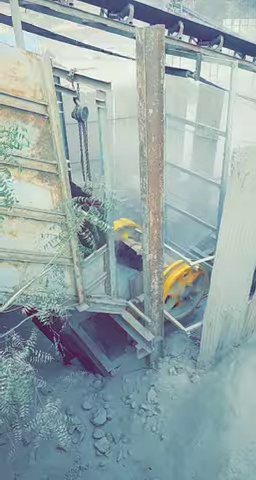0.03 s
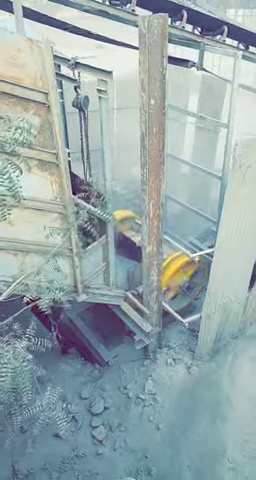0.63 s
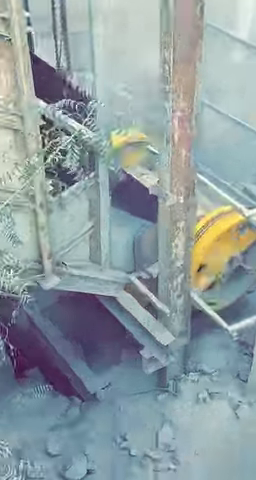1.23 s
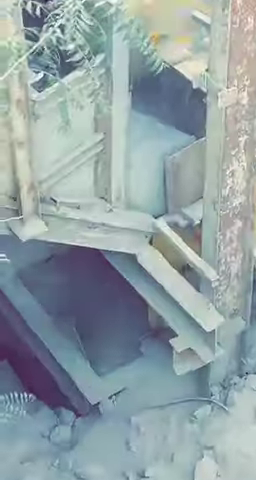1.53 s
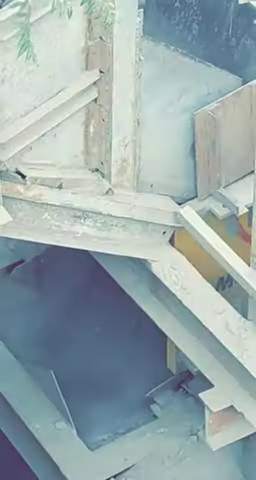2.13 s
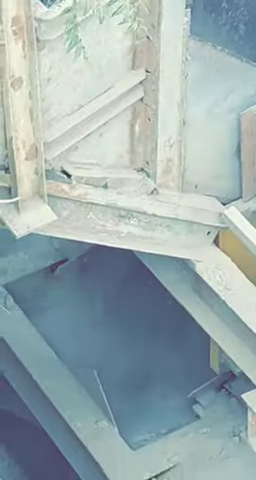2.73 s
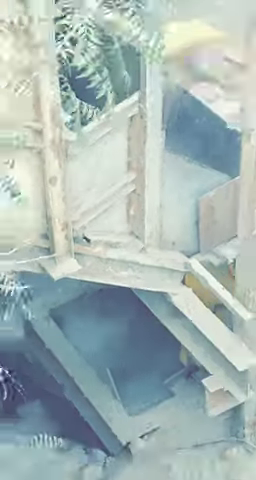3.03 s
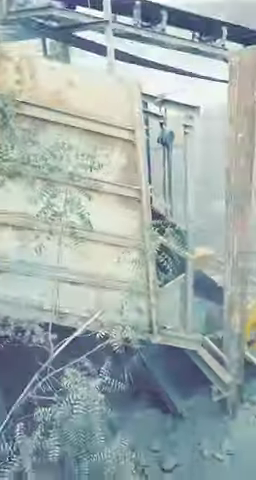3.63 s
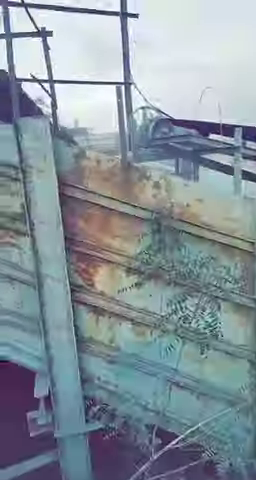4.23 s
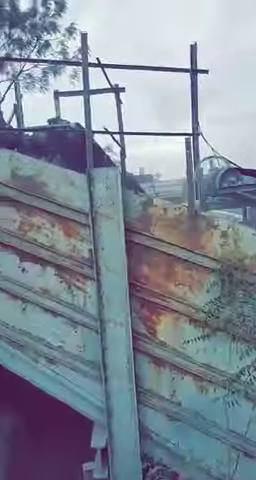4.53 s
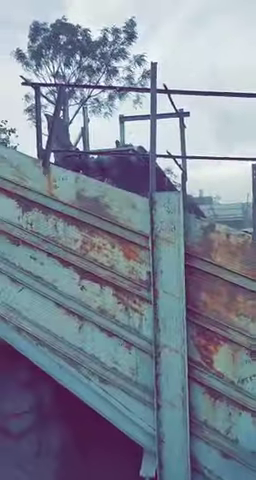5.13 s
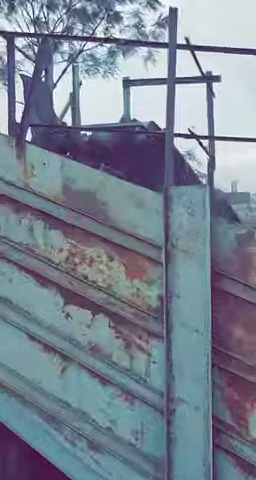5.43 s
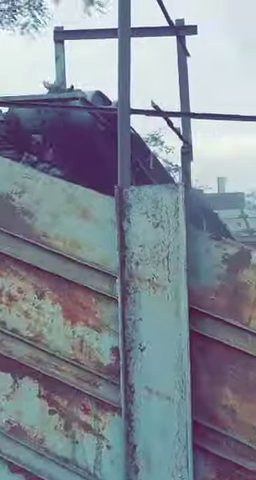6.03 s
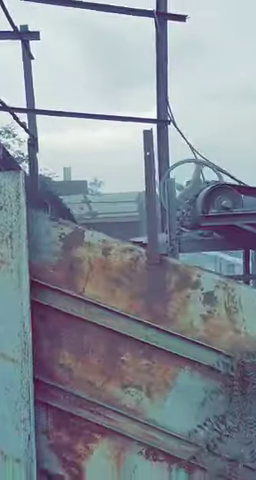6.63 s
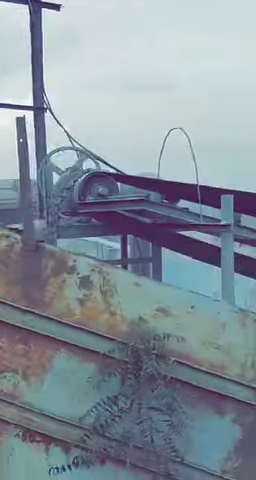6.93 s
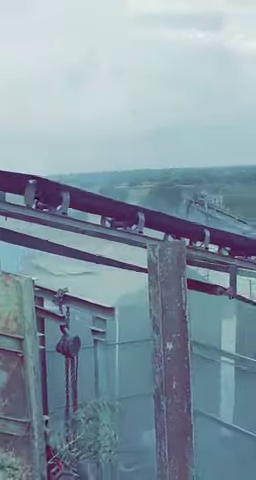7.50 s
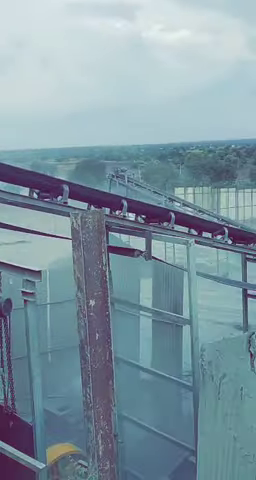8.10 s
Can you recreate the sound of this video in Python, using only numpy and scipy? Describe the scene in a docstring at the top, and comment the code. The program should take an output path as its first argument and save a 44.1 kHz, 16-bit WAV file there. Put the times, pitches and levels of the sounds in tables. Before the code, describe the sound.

Rock tumbles through a steel hopper and cracks in a crusher, while a drive whines and a dry conveyor roller chirps rhythmically.

```python
"""An outdoor stone crushing plant, one microphone close beside the steel feed hopper.
From the first moment rock rumbles in the hopper, cracks in the jaws and slides on as gravel, surging
with the machine's stroke; a drive whines in swells, two pulleys squeak and dry steel squeals faintly.
About four seconds in, the microphone turns from the jaws to the conveyor: stone rasps on the chute and
the roller's chirp and hoot, once a turn, come forward. Near the end it turns partway back."""
import sys
import numpy as np
from scipy import signal
from scipy.fft import rfft, irfft, next_fast_len
from scipy.io import wavfile

SR = 44100
rng = np.random.default_rng(int(sys.argv[2]) if len(sys.argv) > 2 else 0)


def dump(signal):
    """Clip the signal to [-1, 1] and save it as 16-bit WAV at the path in sys.argv[1]."""
    limited = np.clip(np.atleast_2d(signal).T, -1, 1)
    pcm = np.round(limited * 32767).astype(np.int16)
    wavfile.write(sys.argv[1], SR, pcm)


N = 364266
TIME = np.arange(N) / SR

# Levels in the tables are relative; each source adds its own trim.
# microphone's aim, 0 at the jaws and 1 at the conveyor: time_s, share
MIC_AIM = [(0.3, 0.2), (2.8, 0.07), (3.5, 0.24), (3.95, 0.3), (4.3, 0.64), (6.8, 0.83), (8.2, 0.45)]
# slow drift of the flow of stone: time_s, hopper_db, jaws_db, gravel_db
FLOW_DRIFT = [(0.3, -19, -23, -25.5), (1.2, -20.5, -24.5, -29.5), (2.1, -19, -24, -28.5),
              (2.9, -19.5, -25, -28), (3.7, -20, -26, -29.5), (4.3, -19.5, -25.5, -28),
              (5.1, -22.5, -24.5, -27), (5.7, -20, -25.5, -27.5), (6.3, -20.5, -26, -27.5),
              (7.2, -20.5, -25, -28), (8.2, -19.5, -26.5, -29)]
# the feed catches for a moment: middle_s, length_s, hopper_db, jaws_db, gravel_db
FEED_LULLS = [(0.53, 0.063, -2.5, 0.5, 6), (0.6, 0.13, 0.5, -3.5, -5), (1.702, 0.037, -2, 1.5, 3.5),
              (2.275, 0.07, -3, -1.5, 1), (3.113, 0.2, 1, -0.5, -4), (3.217, 0.09, -4, 1.5, 1),
              (3.848, 0.1, -3, -0.5, 1.5), (4.375, 0.058, -3, 1.5, -5), (4.986, 0.041, -1.5, -3, -2.5),
              (5.263, .05, -5, 0, -0.5), (7.512, 0.052, -2, -1.5, -7), (7.7, 0.14, -1.5, -4, -5.5)]
# a heap of stone gives way: middle_s, length_s, hopper_db, jaws_db, gravel_db
HEAP_SPILLS = [(0.502, 0.094, -5, 3, -2), (0.83, 0.049, 5, 1, -3.5), (1.212, 0.16, 1.5, 3, 2.5),
               (1.604, 0.061, 2.5, -0.5, -0.5), (3.345, .06, 2, 2, 0.5), (3.593, 0.049, 0.5, 3.5, 1.5),
               (3.774, .05, -1, 4.5, 1.5), (3.9, 0.11, 0, 4.5, -1), (5.678, 0.063, 1.5, 2, 2),
               (5.82, 0.044, -1, 0, 2), (7.393, 0.083, -1, -0.5, 0)]
# spectra of the three streams of stone: frequency_hz, level_db
HOPPER_COLOUR = [(25, -54), (50, -50.5), (98, -32), (145, -17), (168, -7.5), (210, 1), (330, -1),
                 (430, -6.5), (600, -13), (900, -15.5), (2000, -44)]
JAWS_COLOUR = [(250, -44), (480, -7), (680, -0.5), (1050, -2), (1300, -4), (1750, -7), (2400, -3.5),
               (3000, -11.5), (4200, -24), (9000, -43)]
GRAVEL_COLOUR = [(1500, -34), (2700, -2), (3400, 0), (4500, -1), (5150, -3.5), (6300, -3), (7500, -6.5),
                 (9500, -9), (12000, -14.5), (15500, -19.5)]
# steel plates rung by the stone: pitch_hz, width_hz, lift_facing_jaws_db, lift_facing_conveyor_db
PLATE_MODES = [(164.7, 5.2, 7, 9), (209.4, 3.8, -0.5, 2), (350, 24, 1, 4), (419.5, 21, 2, 5),
               (494, 15, 4.5, 4), (790, 200, 1, -5.5), (1117, 36, -0.5, 6), (1483, 115, 6, -2),
               (1840, 410, 0, 3.5), (2370, 420, 4, -2.5), (2820, 23, 6.5, 3), (3845, 110, 3.5, 6.5),
               (4160, 56, 5.5, 2.5), (4390, 150, 3, 4), (4760, 79, 3, 7), (5800, 87, 4, 2),
               (6670, 50, 6, 2.5), (9600, 93, -9, 2), (11600, 70, -2, -3), (13330, 70, 4, 1)]
# boulders dropping in the hopper: start_s, level_db, pitch_hz
BOULDER_DROPS = [(0.346, -16, 291), (.587, -12.5, 255), (.857, -15, 276), (1.33, -12, 272),
                 (1.483, -18, 332), (1.77, -13, 200), (2.452, -10.5, 273), (2.685, -12, 255),
                 (3.077, -8, 287), (3.129, -11.5, 391), (3.174, -11, 325), (3.377, -11, 371),
                 (3.398, -16, 345), (3.649, -10.5, 292), (3.76, -13, 283), (4.328, -11, 345),
                 (4.347, -10, 338), (5.512, -8.5, 332), (5.702, -12, 305), (6.076, -11, 313),
                 (6.221, -12, 409), (6.403, -12.5, 402), (6.461, -12.5, 262), (6.797, -10.5, 409),
                 (7.024, -14.5, 280), (7.47, -9, 436), (7.845, -12.5, 275), (7.992, -14, 270),
                 (8.049, -9, 345)]
# stones cracking against steel: start_s, level_db, pitch_hz
STONE_CRACKS = [(0.359, -15, 2320), (.356, -15, 857), (0.53, -16, 3840), (0.91, -16, 2430),
                (1.404, -17, 834), (2.189, -12.5, 2310), (2.83, -12.5, 2230), (3.562, -18, 780),
                (3.755, -16, 895), (3.96, -16, 863), (4.342, -19, 804), (4.43, -17, 2370), (4.5, -12, 4130),
                (6.052, -14.5, 2260), (6.507, -15.5, 915), (7.845, -18, 856)]
# stones glancing off plates: start_s, level_db, pitch_hz
PLATE_PINGS = [(0.45, -17, 1133), (0.742, -21, 2390), (0.82, -24, 790), (0.905, -23, 2510),
               (1.41, -18, 708), (2.215, -16.5, 522), (2.575, -21, 1046), (3.675, -21, 2400),
               (3.762, -22, 678), (3.785, -21, 990), (3.885, -21, 1098), (5.415, -27, 2310),
               (5.675, -22, 740), (7.775, -29, 2370)]
# swells of the drive's whine, flatter under load: middle_s, length_s, pitch_hz, level_db
DRIVE_SWELLS = [(0.38, .08, 1530, -28), (0.495, 0.11, 1484, -24), (0.6, 0.086, 1440, -28),
                (.73, .07, 1438, -22), (1.02, 0.076, 1484, -23), (1.37, 0.15, 1486, -25),
                (1.58, .07, 1443, -24), (1.75, .08, 1443, -24), (1.87, 0.073, 1484, -27),
                (2.17, 0.067, 1518, -25.5), (2.34, 0.13, 1484, -26), (2.45, 0.08, 1440, -29),
                (2.72, 0.16, 1485, -26), (2.85, .08, 1535, -34), (3.14, 0.08, 1515, -33),
                (3.3, .08, 1490, -29), (3.48, 0.1, 1487, -24), (3.62, 0.052, 1513, -30),
                (3.9, 0.078, 1494, -22), (4.32, 0.065, 1492, -32), (4.84, 0.092, 1488, -29),
                (5.24, 0.047, 1463, -28), (7.03, 0.055, 1498, -21.5), (7.35, .09, 1515, -33),
                (7.75, .08, 1445, -39), (7.89, 0.13, 1508, -28.5)]
# turns of the conveyor roller, now dry, now smooth: middle_s, pitch_hz, chirp_db, hoot_db
ROLLER_TURNS = [(0.875, 4800, -35, -46), (1.193, 4700, -30, -46), (1.503, 4660, -31, -46),
                (1.818, 4730, -29, -46), (2.135, 4670, -24, -46), (2.452, 4650, -30, -46),
                (2.764, 4630, -29, -44), (3.09, 4740, -39, -42), (3.403, 4760, -32, -34),
                (3.72, 4730, -31, -34), (4.04, 4760, -36, -36), (4.358, 4760, -41, -25),
                (4.669, 4740, -25, -30), (4.992, 4770, -27, -27), (5.307, 4750, -29, -31),
                (5.621, 4770, -22, -34), (5.935, 4750, -30.5, -30), (6.252, 4740, -35, -28),
                (6.575, 4760, -26, -31), (6.885, 4720, -29.5, -29), (7.2, 4820, -42, -42),
                (7.521, 4700, -42, -44), (7.853, 4730, -34, -44)]
# rock grinding along the hopper wall: middle_s, length_s, level_db
WALL_GRINDS = [(.4, .2, -34), (1.867, .18, -24), (4.923, 0.16, -28), (6.73, 0.16, -27), (6.95, .16, -26.5)]
# dry steel squealing, and (row at 5.26 s) one further hoot of the conveyor roller: middle_s, length_s,
# pitch_hz, level_db
STEEL_SQUEALS = [(0.655, 0.1, 3865, -27), (0.793, 0.075, 3830, -31), (1.035, .04, 3825, -26),
                 (1.085, 0.11, 3840, -25), (1.343, 0.075, 3835, -29), (1.479, 0.06, 3830, -28),
                 (2.16, 0.04, 4070, -31), (2.31, 0.065, 4090, -31), (2.635, .05, 3820, -32),
                 (2.975, 0.11, 3780, -31.5), (3.335, 0.09, 3795, -27.5), (3.601, .06, 3830, -34),
                 (4.3, .09, 15500, -39), (4.635, .03, 3830, -32), (4.901, .06, 3830, -32),
                 (5.26, .07, 1125, -28), (5.488, 0.1, 3560, -31), (5.845, 0.056, 3830, -32),
                 (6.605, .075, 3870, -26.5), (7.37, 0.035, 4150, -28), (7.43, .05, 3950, -27),
                 (7.828, .025, 4290, -28), (8.115, 0.045, 3910, -29)]
# rotation of the two pulleys: first_s, turn_s, turns_without_full_squeak
PULLEY_TIMING = [(.268, .3985, (4, 7, 11, 12, 16, 17, 18)), (.365, .426, (1, 3, 5, 9, 11, 13, 14, 15, 17))]
# full squeak of each pulley: length_s, pitch_hz, sharp_start_hz, level_db
PULLEY_SQUEAKS = [(.095, 13800, 130, -36), (0.109, 9570, -2, -41)]
# thin high pips, many in time with the roller's turn, and (last row) one softer pulley squeak:
# middle_s, pitch_hz, sharp_start_hz, level_db
HIGH_PIPS = [(0.323, 12100, 200, -26), (0.63, 12500, 1800, -30), (0.66, 12080, 300, -30),
             (0.943, 12030, 1100, -23), (1.445, 14400, 0, -35), (1.895, 11330, 0, -37),
             (2.375, 11600, 0, -29), (2.529, 11800, 1700, -23), (3.148, 12730, 500, -35),
             (4.112, 11380, 0, -32), (4.322, 10130, 0, -29), (5.052, 11900, 400, -28), (5.6, 10100, 0, -32),
             (5.688, 12020, 1400, -33), (6.973, 11890, 400, -28), (7.432, 14500, 400, -39),
             (7.45, 13720, 0, -37)]
# stone scraping along the chute: time_s, level_db, centre_hz
CHUTE_SCRAPE = [(0.3, -47, 4490), (3.7, -49, 4610), (3.95, -43, 4620), (4.15, -33, 4710), (4.35, -35, 4650),
                (4.5, -35, 4560), (4.9, -40, 4550), (5.6, -49, 4060), (7.0, -40, 4070), (7.35, -33.5, 4150),
                (7.6, -34, 4160), (7.7, -39, 4150), (7.82, -36, 4130), (8.2, -37, 4220)]
# plate modes that stray chips set singing: pitch_hz, level_db
CHIP_MODES = [(6660, -56.5), (9470, -58), (11600, -54), (13330, -53), (14500, -61)]


def hopper():
    """Heavy rock tumbles against the hopper walls, right beside the microphone."""
    rock = steelwork(stones(per_s=190, spread_db=0.5, ring_s=0.024, rise_s=0.0033), HOPPER_COLOUR)
    return rock * gain_of(flow(1)) * stroke(depth_db=0.93, lag_s=-0.031)


def jaws():
    """Stone breaks between the jaws in a dense clatter."""
    clatter = steelwork(stones(per_s=310, spread_db=4, ring_s=0.019, rise_s=0.0009), JAWS_COLOUR)
    return clatter * gain_of(flow(2) - 0.63) * stroke(depth_db=0.6, lag_s=-0.058)


def gravel():
    """Chips are tossed along the steel, rattling and hissing."""
    chips = steelwork(stones(per_s=350, spread_db=4, ring_s=0.014, rise_s=0.0021), GRAVEL_COLOUR)
    return chips * gain_of(flow(3) - 0.92) * stroke(depth_db=1.55, lag_s=-0.098)


def boulders(knock_ratio=1.8):
    """Each boulder booms on the hopper wall, with a short, hard knock from the higher modes."""
    boom = blows(BOULDER_DROPS, spread=0.16, ring_s=0.021, trim_db=-1.5)
    knocks = [(s, db, hz * knock_ratio) for s, db, hz in BOULDER_DROPS]
    return boom + blows(knocks, spread=0.35, ring_s=0.011, trim_db=-5)


def cracks():
    """Single stones crack against the steel."""
    return blows(STONE_CRACKS, spread=0.22, ring_s=0.019)


def pings(ring_s=0.022, split=0.0085):
    """A stone glances off a plate and leaves one close pair of modes ringing."""
    out, t = np.zeros(N), np.arange(SR // 5) / SR
    for s, db, hz in PLATE_PINGS:
        lower = np.sin(2 * np.pi * hz * t)
        upper = 0.44 * np.sin(2 * np.pi * (hz * (1 + split) * t + rng.random()))
        envelope = np.exp(-t / ring_s) * (1 - np.exp(-t * hz / 2))
        add(out, s, gain_of(db) * (lower + upper) * envelope)
    return out


def drive(jitter_hz=9, flutter_db=2.5, rasp=0.35, trim_db=-5.7):
    """The drive's rough whine steps in pitch as the load changes, holding each pitch for a swell."""
    jitter, roughness = jitter_hz * wander(53), rasp * wander(49)

    def whine(hz):
        angle = phase_of(hz + jitter)
        return np.sin(angle) + roughness * np.cos(angle)

    swells = sum(gain_of(db) * swell(s, length_s) * whine(hz) for s, length_s, hz, db in DRIVE_SWELLS)
    rest_db = np.interp(curve(MIC_AIM, 1), [0, 1], [-36.5, -38.5])  # fainter facing the conveyor
    rest = gain_of(rest_db) * whine(curve(DRIVE_SWELLS, 2))
    return np.sqrt(2) * (swells + rest) * gain_of(flutter_db * wander(25) + trim_db)


def roller(chirp_trim_db=1, hoot_trim_db=-0.5, hoot_lag_s=0.108, hoot_s=0.08):
    """Each turn of the conveyor roller gives a rising chirp, then a low, rough hoot."""
    out = np.zeros(N)
    for s, hz, chirp_db, hoot_db in ROLLER_TURNS:
        chirp_s, glide_hz = rng.uniform(0.031, 0.041), rng.uniform(130, 270)
        chirp = squeak(chirp_s, hz, jitter_hz=40, broken_db=3, glide_hz=glide_hz)
        hoot = squeak(hoot_s, hz=1121, jitter_hz=26, broken_db=3, glide_hz=20)
        add(out, s - chirp_s / 2, gain_of(chirp_db + chirp_trim_db) * chirp)
        add(out, s + hoot_lag_s - hoot_s / 2, gain_of(hoot_db + hoot_trim_db) * hoot)
    return reflections(out, decay_s=0.017, wet=0.27)


def wall(hz=207, jitter_hz=5, flutter_db=0.5):
    """The hopper wall drones on its main mode while rock grinds along it."""
    grinding = sum(gain_of(db) * swell(s, length_s) for s, length_s, db in WALL_GRINDS)
    flutter = gain_of(flutter_db * wander(9.7))
    return np.sqrt(2) * grinding * flutter * np.sin(phase_of(hz + jitter_hz * wander(15.8)))


def squeals(trim_db=-1):
    """Stone dragged over dry steel gives fluttering squeals and brief scrapes."""
    out = np.zeros(N)
    for s, length_s, hz, db in STEEL_SQUEALS:
        tone = squeak(length_s, hz, jitter_hz=52, broken_db=5.5, flutter_hz=60)
        add(out, s - length_s / 2, gain_of(db + trim_db) * tone)
    return reflections(out, decay_s=0.015, wet=0.34)


def pulleys_and_pips(scatter_db=2.5, pip_s=0.033, pip_trim_db=-1.5):
    """Two pulleys squeak on some turns, among thin high pips, many in time with the roller's turn."""
    out = np.zeros(N)
    for timing, (length_s, hz, sharp_hz, db) in zip(PULLEY_TIMING, PULLEY_SQUEAKS):
        first_s, turn_s, turns_without_full_squeak = timing
        times = np.arange(first_s, N / SR, turn_s)
        levels_db = db - scatter_db * rng.standard_normal(len(times))
        for turn, s in enumerate(times):
            if turn not in turns_without_full_squeak:
                tone = squeak(length_s, hz, jitter_hz=55, broken_db=5, sharp_hz=sharp_hz)
                add(out, s - length_s / 2, gain_of(levels_db[turn]) * tone)
    for s, hz, sharp_hz, db in HIGH_PIPS:
        pip = squeak(pip_s, hz, jitter_hz=150, broken_db=3, sharp_hz=sharp_hz)
        add(out, s - pip_s / 2, gain_of(db + pip_trim_db) * pip)
    return reflections(out, decay_s=0.019, wet=0.37)


def chute(width_hz=470):
    """Sliding stone rubs the chute into a rasp whose pitch drifts."""
    angle = phase_of(curve(CHUTE_SCRAPE, 2))
    rasp = wander(width_hz) * np.sin(angle) + wander(width_hz) * np.cos(angle)
    return gain_of(curve(CHUTE_SCRAPE, 1)) * rasp


def grit(per_s=32, count=280, low_hz=5510, high_hz=14960, mean_length_s=0.019, trim_db=-38):
    """Grit on the steel gives many tiny, high squeaks, fainter towards the top."""
    out = np.zeros(N)
    colour_hz, colour_db = np.transpose(GRAVEL_COLOUR)
    gaps, heights, sizes = rng.random((count, 3)).T
    starts = np.cumsum(2 * gaps / per_s)
    pitches = low_hz + heights * (high_hz - low_hz)
    for s, hz, size in zip(starts, pitches, sizes):
        db = trim_db + 0.5 * np.interp(hz, colour_hz, colour_db) + 3 * (size - 1)
        tone = squeak(mean_length_s * (0.5 + size), hz, jitter_hz=45, broken_db=-2)
        add(out, s, gain_of(db) * tone)
    return reflections(out, decay_s=0.023, wet=0.46)


def stray_chips(per_s=7, ring_s=0.016, jitter_hz=50, trim_db=-2):
    """Stray chips scrape the steel and set single modes singing for a moment."""
    out = np.zeros(N)
    for hz, db in CHIP_MODES:
        touches = rng.exponential(1, N) * (rng.random(N) < per_s / SR)
        envelope = die_away(touches, ring_s)
        tone = np.sin(phase_of(hz + jitter_hz * wander(162)))
        out += gain_of(db + trim_db) * evened(envelope * tone)
    return out


def stones(per_s, spread_db, ring_s, rise_s):
    """Random impacts of uneven size, each a quick burst of noise, over a wash of distant ones."""
    size = gain_of(spread_db * np.minimum(rng.exponential(1, N), 3))
    power = (size * (rng.random(N) < per_s / SR)) ** 2
    for seconds in (ring_s, rise_s):
        power = die_away(power, seconds / 2)  # power falls twice as fast as amplitude
    envelope = np.sqrt(power / power.mean() + 1)  # the 1 is the wash
    return evened(envelope * rng.standard_normal(N))


def steelwork(stream, colour, fft_size=2 ** 19):
    """Colours a stream and rings the plates, whose balance shifts as the microphone turns."""
    hz, spectrum = np.fft.rfftfreq(fft_size, 1 / SR), rfft(stream, fft_size)
    grid = np.geomspace(10, SR / 2, 3000)
    colour_hz, colour_db = np.transpose(colour)
    base_db = np.interp(np.log(grid), np.log(colour_hz), colour_db)
    lifts_db = sum(np.outer(lifts, np.exp(-2 * ((grid - mode_hz) / width_hz) ** 2))
                   for mode_hz, width_hz, *lifts in PLATE_MODES)
    responses = (np.interp(hz, grid, gain_of(base_db + db)) for db in lifts_db)
    at_jaws, at_conveyor = (evened(irfft(spectrum * response)[:N]) for response in responses)
    aim = curve(MIC_AIM, 1)
    return (1 - aim) * at_jaws + aim * at_conveyor


def flow(stream, uneven_db=0.66, uneven_hz=5.8):
    """Level in dB of a stream (1 hopper, 2 jaws, 3 gravel): drift, lulls, spills and chance."""
    upsets = sum(dbs[stream - 1] * swell(s, length_s) for s, length_s, *dbs in FEED_LULLS + HEAP_SPILLS)
    return curve(FLOW_DRIFT, stream) + upsets + uneven_db * wander(uneven_hz)


def stroke(depth_db, lag_s, stroke_hz=5.225):
    """The surge of a stream with each stroke of the machine."""
    return gain_of(depth_db * np.cos(2 * np.pi * stroke_hz * (TIME - lag_s)))


def blows(rows, spread, ring_s, trim_db=0):
    """Each blow rings a cluster of 30 plate modes around its own pitch."""
    out, t = np.zeros(N), np.arange(SR // 5) / SR
    for s, db, hz in rows:
        scatter, phase = rng.standard_normal((2, 30, 1))
        modes_hz = hz * np.exp(spread * scatter)
        modes = np.sin(2 * np.pi * (modes_hz * t + phase)).sum(0)
        ring = modes * np.exp(-t / ring_s) * (1 - np.exp(-2 * t * hz))
        add(out, s, gain_of(db + trim_db) * ring / abs(ring).max())
    return low_cut(out, hz=170, order=4)  # the plates radiate almost no deep bass


def squeak(length_s, hz, jitter_hz, broken_db, glide_hz=0, sharp_hz=0, flutter_hz=110):
    """Dry steel sticks and slips: a short, broken tone that may glide, or start sharp and settle."""
    position = np.linspace(-0.5, 0.5, max(int(length_s * SR), 64))
    pitch = hz + glide_hz * position + sharp_hz * (0.5 - position) ** 4
    pitch += jitter_hz * wander(310, len(position))
    grip = evened(gain_of(broken_db * wander(flutter_hz, len(position))))
    return np.sqrt(2) * np.cos(np.pi * position) * grip * np.sin(phase_of(pitch))


def reflections(direct, decay_s, wet, per_s=2000):
    """Adds dense early reflections from the steel around the microphone."""
    t = np.arange(SR // 6) / SR
    taps = rng.standard_normal(len(t)) * (rng.random(len(t)) < per_s / SR) * np.exp(-t / decay_s)
    echoes = signal.oaconvolve(direct, taps / np.linalg.norm(taps))[:N]
    return (direct + wet * echoes) / np.sqrt(1 + wet ** 2)


def wander(rate_hz, size=N):
    """Smooth random motion of rms 1, rolling off above the rate."""
    padded = next_fast_len(size)
    hz = np.fft.rfftfreq(padded, 1 / SR)
    spectrum = rfft(rng.standard_normal(padded)) * np.exp(-(hz / rate_hz) ** 2 / 2)
    return evened(irfft(spectrum, padded)[:size])


def swell(middle_s, length_s):
    """A smooth rise and fall, above half height for its length."""
    return np.exp2(-np.minimum((2 * (TIME - middle_s) / length_s) ** 2, 60))


def curve(rows, column):
    """One column of a table, joined by straight lines in time."""
    rows = np.array(rows)
    return np.interp(TIME, rows[:, 0], rows[:, column])


def die_away(hits, decay_s):
    """Gives each hit an exponential tail."""
    return signal.lfilter([1], [1, -np.exp(-1 / (decay_s * SR))], hits)


def low_cut(x, hz, order):
    """Rolls off the bass."""
    return signal.sosfilt(signal.butter(order, hz, "high", fs=SR, output="sos"), x)


def phase_of(hz):
    """Running phase of a moving pitch, in radians."""
    return 2 * np.pi * np.cumsum(hz) / SR


def gain_of(db):
    """Decibels to amplitude."""
    return 10 ** (np.asarray(db) / 20)


def evened(x):
    """Scales to rms 1."""
    return x / np.sqrt(np.mean(x ** 2) + 1e-20)


def add(mix, start_s, sound):
    """Mixes a sound in from its start time."""
    part = mix[max(round(start_s * SR), 0):][:len(sound)]
    part += sound[:len(part)]


def scene():
    """The whole plant from beside the hopper, alike in both channels."""
    stone = cracks() + hopper() + wall() + jaws() + gravel() + chute()
    stone += stray_chips() + grit() + boulders() + pings() + squeals()
    plant = stone + drive() + roller() + pulleys_and_pips()
    return np.array([plant, plant])


def record(dry, start_s=0.2858, fade_s=0.004, top_hz=15800):
    """The microphone opens abruptly, with a low cut and the highest treble removed."""
    opened = dry * np.clip((TIME - start_s) / fade_s, 0, 1)
    high_cut = signal.firwin(511, top_hz, window=("kaiser", 9), fs=SR)
    return signal.oaconvolve(low_cut(opened, hz=35, order=2), high_cut[None], "same")


dry = scene()
out = record(dry)
dump(out)
```